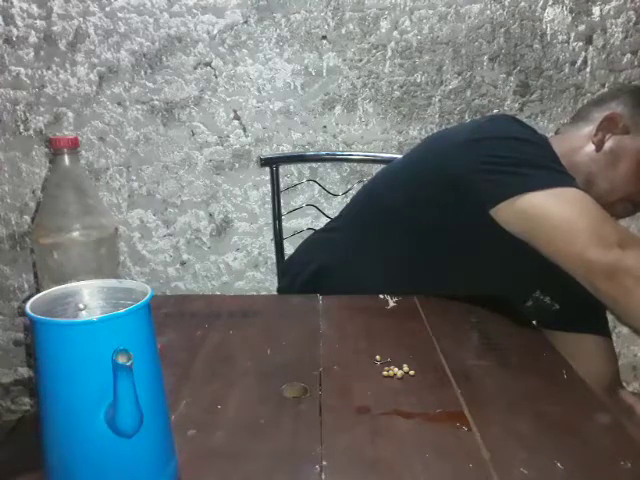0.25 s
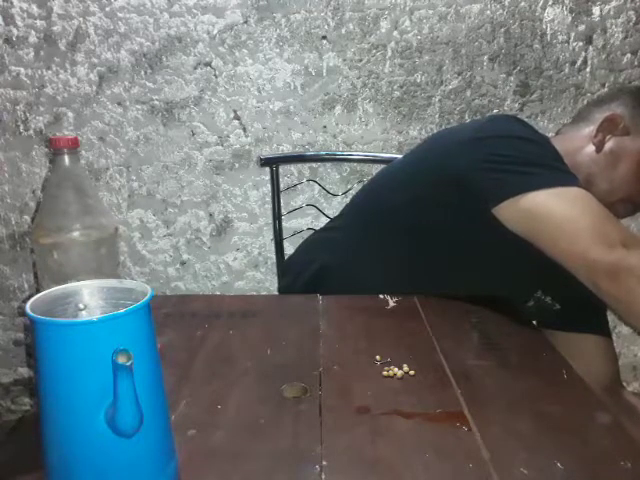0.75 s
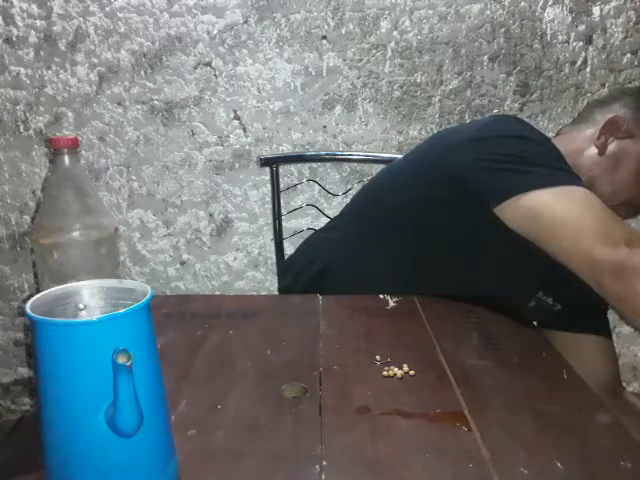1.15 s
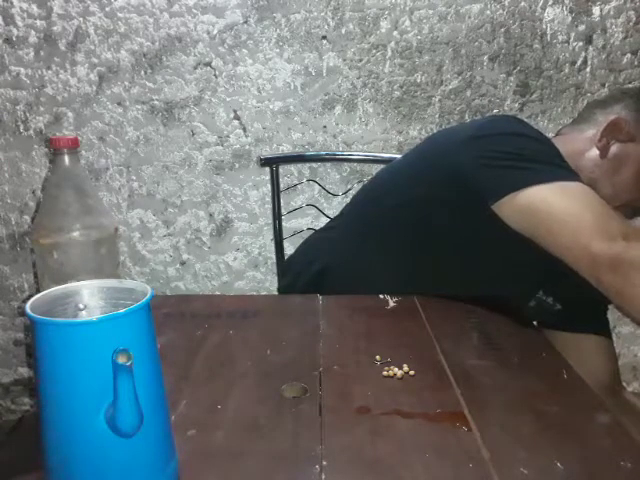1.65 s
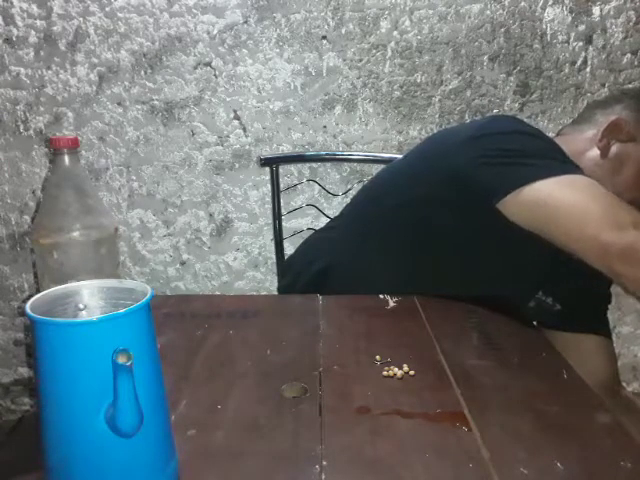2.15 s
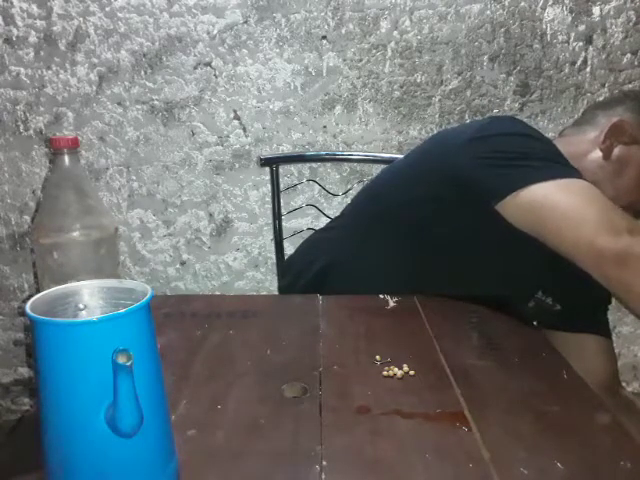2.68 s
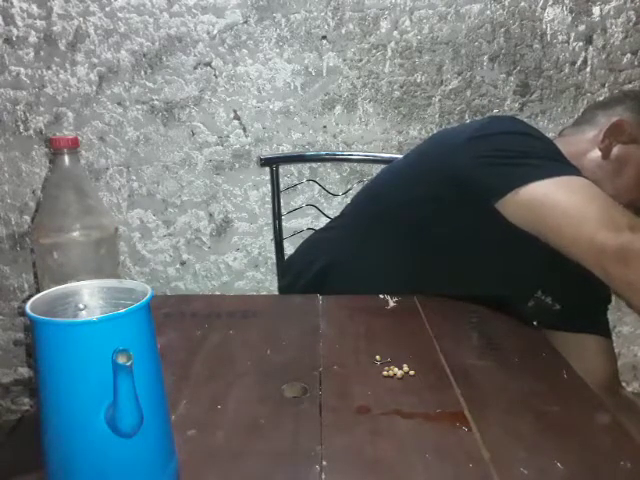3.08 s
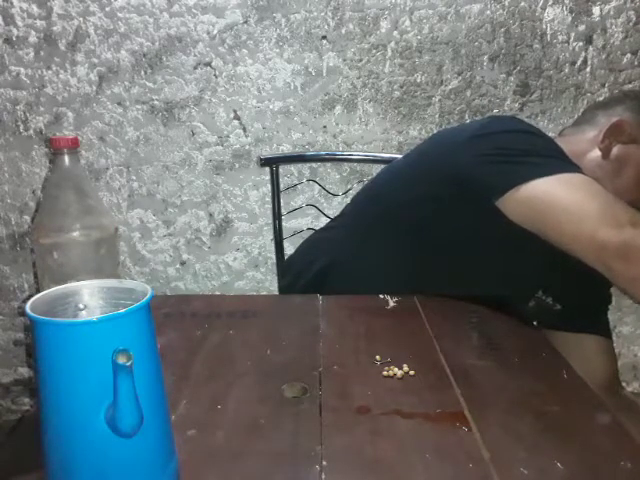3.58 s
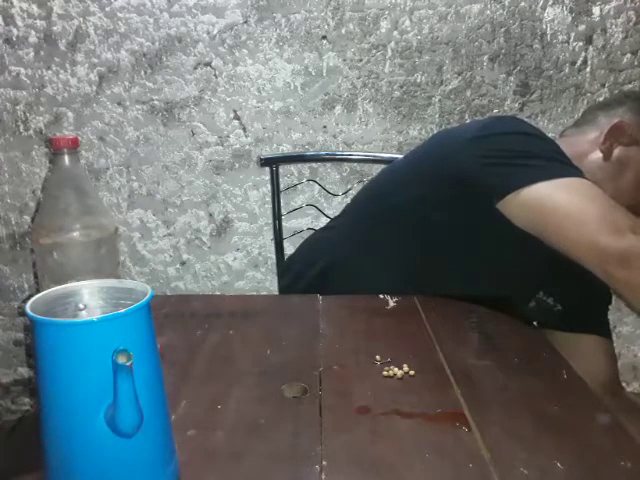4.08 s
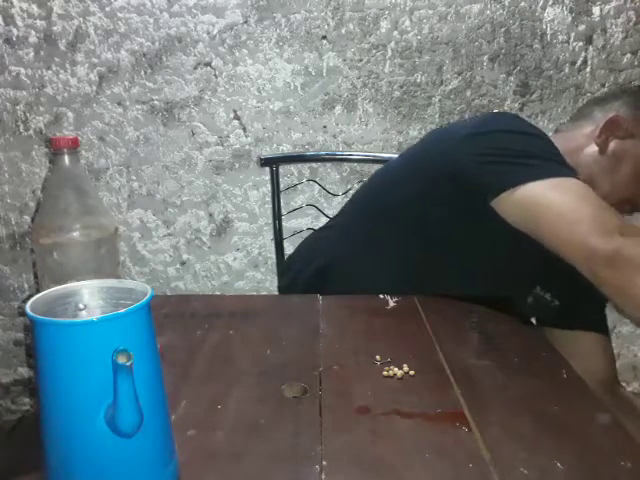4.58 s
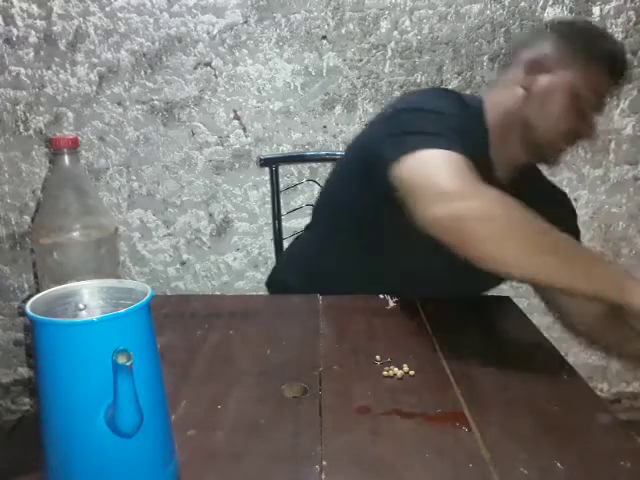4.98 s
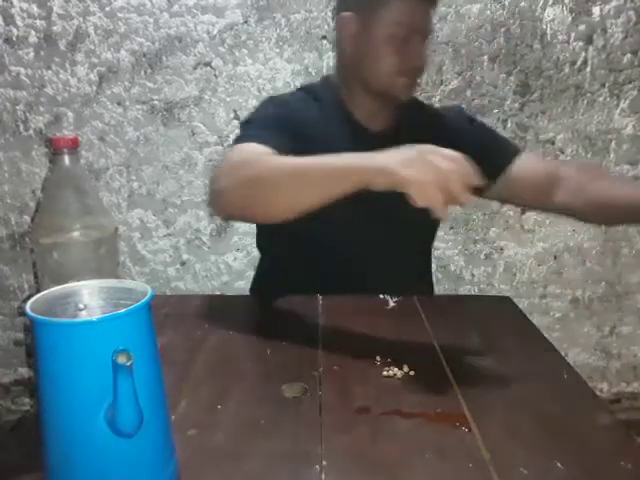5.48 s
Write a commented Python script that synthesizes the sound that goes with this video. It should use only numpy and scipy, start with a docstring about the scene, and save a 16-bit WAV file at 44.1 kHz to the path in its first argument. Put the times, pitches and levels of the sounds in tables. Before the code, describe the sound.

Indoors, close to the microphone, a flimsy bottle buckles under repeated squeezes. Each squeeze pushes out a faint breathy, spitting hiss; the plastic snaps in dry, irregular bursts with hollow low pops and small creasing ticks. Hard walls add a short bright ring. The strongest snaps come later, then the bottle moves away with a swelling scratchy rustle that stops abruptly, leaving low room tone.

```python
"""Over quiet room tone and a hollow rumble come faint cracks and a hiss: a hand squeezes a thin plastic bottle.
In a small hard-walled room it is squeezed and let go repeatedly; each squeeze drives out turbulent air and spray,
and a weak draught returns. The wall buckles in filtered noise bursts, with tiny ticking creases around them, and
its large panels pop as damped sines. At the end the bottle is moved away with a rustle of dense random slips."""
import sys
import numpy as np
from scipy import signal
from scipy.fft import rfft, irfft
from scipy.io import wavfile

SR = 44100
rng = np.random.default_rng(int(sys.argv[2]) if len(sys.argv) > 2 else 0)


def master_out(mix):
    """Clip the mix to full scale and print it as 16-bit PCM to the path in sys.argv[1]."""
    frames = np.transpose(np.atleast_2d(mix))
    ceiling = np.clip(frames, -1, 1)
    pcm = np.round(ceiling * 32767).astype(np.int16)
    wavfile.write(sys.argv[1], SR, pcm)


N = 253265
TIME = np.arange(N) / SR

# Spectrum of the cracking wall as heard, bright near 7.8 kHz with a dip at 9-10 kHz. Each row: frequency in Hz,
# relative level in dB per Hz.
WALL_COLOUR = [(70, -29), (160, -15), (500, -5.5), (850, -2.5), (1200, -4), (1700, 1), (3500, 3.5),
               (5500, 3), (7800, 7), (8400, 1), (9200, -10), (10200, -11.5), (11800, -8.5), (15500, -12)]
# Whole panels popping in or out. Each row: start in seconds, strength in dB before a common trim,
# pitch in Hz, 60 dB decay time in ms.
PANEL_POPS = [(.2907, -35.5, 624, 18), (0.532, -39.5, 603, 16), (.599, -30.5, 363, 9.7),
              (.618, -28, 470, 14), (0.7229, -36.5, 321, 9.2), (1.0487, -34.5, 473, 23),
              (1.2488, -34.5, 624, 22), (1.2897, -29.5, 404, 7.2), (1.2964, -27, 423, 14),
              (1.338, -22, 468, 7.8), (1.7489, -36, 517, 14), (1.8733, -36, 570, 11),
              (1.9613, -24, 380, 9.3), (2.0199, -26, 570, 10.4), (2.0959, -30.5, 418, 16),
              (2.241, -29.5, 406, 12), (3.002, -35, 348, 8.3), (3.0293, -28.5, 515, 8.3),
              (3.5926, -28, 444, 15), (3.6718, -27.5, 394, 12), (3.7075, -23, 420, 9),
              (3.8581, -23, 512, 6.8), (4.202, -24, 362, 9.9), (4.703, -32, 262, 12),
              (4.7279, -26.5, 475, 43), (4.8249, -33, 353, 10)]
# Squeezes of the hand. Each row: start in seconds, length in seconds, level of the air stream in dB
# before the gain of the jet.
HAND_SQUEEZES = [(.15, .295, -41.5), (.92, 0.23, -43), (1.606, 0.2, -41), (2.515, 0.24, -48),
                 (3.268, .17, -52), (3.938, 0.13, -52.5), (4.442, 0.13, -47.5)]
# strength of a typical buckle, from which knock and creasing are reckoned
TYPICAL_DB = -25
# the bottle is held until it starts to move away
MOVE_S = 5.09


def undb(db):
    """Logarithmic level: decibels become an amplitude gain."""
    return 10 ** (np.asarray(db) / 20)


def unit(x):
    """Energy normalisation: the squares sum to 1."""
    return x / np.sqrt(np.sum(x ** 2) + 1e-18)


def steady(x):
    """Power normalisation: the rms becomes 1."""
    return unit(x) * np.sqrt(len(x))


def strength(db):
    """Gain that gives a sound of energy 1 the energy of one millisecond at this level."""
    return undb(db) * np.sqrt(SR / 1000)


def spectrum(points, hz):
    """Interpolation of (Hz, value) points along a logarithmic frequency axis."""
    point_hz, value = np.transpose(points)
    return np.interp(np.log(hz + 1), np.log(point_hz), value)


def response(points, size=512):
    """Minimum phase: folding the cepstrum gives the causal impulse response of a (Hz, dB) colour."""
    log_gain = np.log(undb(spectrum(points, np.fft.rfftfreq(size, 1 / SR))))
    cepstrum = irfft(log_gain)
    cepstrum[1:size // 2] *= 2
    cepstrum[size // 2 + 1:] = 0
    return irfft(np.exp(rfft(cepstrum)))


def colour(x, points, size=512):
    """Linear filtering: convolution with an impulse response imposes the spectrum."""
    return signal.fftconvolve(x, response(points, size=size))[:len(x)]


def band(x, lo_hz, hi_hz, order=3):
    """Causal Butterworth band-pass, maximally flat between its edges."""
    edges_hz = [lo_hz, min(hi_hz, SR / 2 - 1)]
    return signal.sosfilt(signal.butter(order, edges_hz, "band", fs=SR, output="sos"), x)


def walk(rate):
    """Slow random modulation: straight lines join normal values drawn this many times a second."""
    knots = rng.standard_normal(1024)
    return np.interp(TIME * rate, np.arange(len(knots)), knots)


def add(track, s, sound):
    """Superposition: a sound is summed into a track at time s."""
    start = max(int(s * SR), 0)
    part = sound[:max(len(track) - start, 0)]
    track[start:start + len(part)] += part


def envelope(start_s, end_s, rise_s, fall_s):
    """Exponential build-up before the start, a gain of 1, and exponential decay after the end."""
    before, after = np.maximum(start_s - TIME, 0), np.maximum(TIME - end_s, 0)
    return np.exp(-before / rise_s - after / fall_s)


def grains(rate, spread_db):
    """Shot noise: sparse random ticks of very uneven size, rms 1; rate is in ticks per second."""
    chance, size, sign = rng.random(N), rng.exponential(size=N), rng.choice([-1, 1], N)
    return steady((chance < rate / SR) * sign * undb(spread_db * np.minimum(size, 3)))


def buckles():
    """Snap-through instability: all snaps of the wall, the distinct ones and the tick that starts each pop."""
    # Distinct buckles. Each row: start in seconds, strength of the crack in dB, pitch of the facet in Hz,
    # ring in ms, fizz in dB relative to the crack, share sent into the room in dB.
    distinct = [(.132, -53, 3500, 2, -16, 5), (.1428, -34, 3040, 1.5, -22, 3.5),
                (.2919, -24.5, 2290, 3, -6, -2), (.3118, -23.5, 5870, 0.47, -6.5, -3),
                (.4852, -39.5, 6500, 1.8, -7.5, 5.5), (.6186, -11, 7600, 0.41, -12, -11),
                (.6198, -13, 2100, 1.9, -13.5, 1), (.9069, -53.5, 2090, 2.3, -15, 0),
                (1.002, -35.5, 2070, 2, -18, -0.5), (1.0491, -22, 4850, 1.4, -13, -1),
                (1.0879, -25.5, 5100, 1.1, -12, -1.5), (1.2044, -46, 2100, 1.7, -11.5, 3),
                (1.2951, -31.5, 4400, 1.4, -26, 1), (1.3374, -13.5, 3080, 1.8, -27, -1),
                (1.5899, -38, 2250, 0.4, -30, 2), (1.6194, -38, 2090, 1.7, -16, 9.5),
                (1.7488, -31, 3550, 2.9, -16, 5.5), (1.8623, -36, 2180, 3.2, -10, 3),
                (2.0187, -19.5, 2160, 1.9, -13.5, -0.5), (2.2401, -14, 4370, 0.79, -16, 5.5),
                (2.242, -7.5, 5130, 2.1, -10.5, 2), (2.2545, -11, 4850, .4, -8, -1),
                (2.2683, -12.5, 6200, .3, -12.5, 3.5), (2.5033, -24, 7840, 2.5, -14, 6.5),
                (2.5722, -18.5, 5000, 1.7, -9.5, 1), (2.6183, -21.5, 8000, 0.39, 4, -7),
                (2.643, -29.5, 8200, 1.4, -6, 4), (2.6502, -21.5, 7100, 0.82, -4.5, 1.5),
                (2.6858, -31.5, 3950, 1.9, -5, 2.5), (2.8633, -33.5, 5400, .6, -17, -3),
                (2.9077, -31.5, 2500, 3.6, -28, 2), (2.92, -30.5, 2300, 4, -23, -16),
                (2.9248, -17.5, 3430, 2.4, -11.5, -0.5), (3.0278, -21.5, 5700, 0.56, -18.5, -5),
                (3.2569, -53, 2230, 1.8, -26, 3.5), (3.3062, -38, 3100, 1.5, -27.5, -5.5),
                (3.3735, -15.5, 4850, 1.1, -9.5, 1), (3.5175, -32, 4180, 0.78, -17.5, 2),
                (3.5812, -19.5, 2020, 1.7, -29, 1), (3.5913, -14.5, 2170, 0.9, -13.5, -2.5),
                (3.7071, -19, 6500, 1.3, -18.5, 3), (3.8574, -6, 4160, 3.2, -9.5, -3),
                (3.864, -11.5, 6200, 1, -13, 5), (4.155, -47, 7960, .5, 3.5, -1.5),
                (4.168, -16.5, 3930, 1.4, -13, -1.5), (4.2026, -13.5, 5250, 1.5, -17, -2),
                (4.2388, -12, 4500, 2.4, -15, 0.5), (4.2478, -8.5, 2060, 1.6, -17, -2),
                (4.4216, -18, 4700, 1.8, -11.5, -1.5), (4.4285, -27.5, 2050, 4.5, -22, 1.5),
                (4.5027, -12.5, 7100, 1.2, -7, -2.5), (4.6758, -25, 3780, 0.9, -20.5, -1.5),
                (4.7267, -25, 4570, 1.5, -19.5, -3), (4.8243, -6, 3970, 2.1, -13, 0),
                (5.1633, -40.5, 6000, .7, -22, -21)]
    # Faint crack with which every panel lets go. One row: the columns above without the start.
    panel_tick = (-40.5, 2501, 2.5, -17, 0)
    return list(distinct) + [(row[0], *panel_tick) for row in PANEL_POPS]


def snap(t, ring_ms, rise_s=0.00018, snap_s=0.00016, ring_share=0.35):
    """Impulsive excitation: a sharp kick, then a dense flurry of bending waves that dies in milliseconds."""
    fall_s = 2.16 * ring_ms / 1000
    decay = np.exp(-t / snap_s) + ring_share * np.exp(-t / fall_s)
    return rng.standard_normal(len(t)) * (1 - np.exp(-t / rise_s)) * decay


def knock(db, facet_hz, ring_ms):
    """Scaling law for the low knock, in dB re the crack: harder, higher or longer buckles knock less."""
    per_db, per_octave, per_ring_doubling = -0.383, -6, -0.5
    return (-9.5 + per_db * (db - TYPICAL_DB)
            + per_octave * np.log2(facet_hz / 4000)
            + per_ring_doubling * np.log2(ring_ms / 1.7))


def buckle(drive, facet_hz, knock_db, fizz_db, flank_db=-6, skirt_db=-10):
    """Resonant radiation: the thin wall answers with a crack at the facet's pitch, a knock below, fizz above."""
    wall = colour(drive, WALL_COLOUR)
    peak_hz = facet_hz * np.array([1 / 2.5, 1 / 1.35, 1, 1.35, 2.5])
    facet = colour(wall, np.transpose([peak_hz, [skirt_db, flank_db, 0, flank_db, skirt_db]]))
    spectra, freqs = rfft([wall, facet, wall]), np.fft.rfftfreq(len(drive), 1 / SR)
    # soft crossovers at 2100 and 9400 Hz share the spectrum among the three
    above_knock = 1 / (1 + (2100 / (freqs + 1)) ** 6)
    above_crack = 1 / (1 + (9400 / (freqs + 1)) ** 24)
    low, crack, fizz = irfft(spectra * [1 - above_knock, above_knock - above_crack, above_crack])
    return unit(crack) + undb(knock_db) * unit(low) + undb(fizz_db) * unit(fizz)


def cracks(lead_s=.001, size=2048, count=3):
    """Directional radiation: every buckle as heard directly, and as it leaves in one of a few directions."""
    direct, outward = np.zeros(N), np.zeros((count, N))
    lead = int(lead_s * SR)
    t = np.maximum(TIME[:size] - lead / SR, 0)
    click = (np.arange(size) == lead) * 1.
    for k, (s, db, facet_hz, ring_ms, fizz_db, room_db) in enumerate(buckles()):
        start_s = s - lead / SR
        knock_db = knock(db, facet_hz, ring_ms)
        heard = buckle(snap(t, ring_ms), facet_hz, knock_db, fizz_db)
        add(direct, start_s, strength(db) * heard)
        # summed over all directions the peaks and dips of the wall's ringing even out
        sent = buckle(click, facet_hz, knock_db, fizz_db)
        add(outward[k % count], start_s, strength(db) * undb(room_db) * sent)
    return direct, outward


def thump(t, hz, t60_ms, body_db=-6, overtone=2.1, overtone_db=-4.0, overtone_t60=0.0091, detune=0.044,
          push_s=0.00091):
    """Modal decay: a panel swings a few times and sets off the hollow modes, which every new dent retunes."""
    # Hollow modes of the bottle. Each row: frequency in Hz, relative level in dB, 60 dB decay time in seconds.
    hollow_modes = [(141, -4, 0.16), (282.6, -0.5, 0.024), (579, 4.5, 0.042), (855, -1.5, 0.014)]
    push = 1 - np.exp(-t / push_s)
    swing = np.sin(2 * np.pi * hz * t) * undb(-60 * t / (t60_ms / 1000))
    # its next bending shape is higher and dies fast
    flex = np.sin(2 * np.pi * hz * overtone * t) * undb(overtone_db - 60 * t / overtone_t60)
    mode_hz, db, mode_t60 = np.transpose(hollow_modes)[:, :, None]
    shift, turn = rng.standard_normal((2, len(hollow_modes), 1))
    tones = np.sin(2 * np.pi * (mode_hz * (1 + detune * shift) * t + turn))
    modes = (undb(db - 60 * t / mode_t60) * tones).sum(axis=0)
    sound = unit((swing + flex) * push) + undb(body_db) * unit(modes * push)
    # the pops carry almost no deep bass
    return unit(band(sound, 130, 1600, order=4))


def thumps(trim_db=-0.5, size=4096, count=3):
    """Directional radiation of the large panels: dull pops, each facing one of a few directions."""
    out = np.zeros((count, N))
    for k, (s, db, hz, t60_ms) in enumerate(PANEL_POPS):
        add(out[k % count], s, strength(db + trim_db) * thump(TIME[:size], hz, t60_ms))
    return out


def stream(arch_drop_db=24.5, arch_power=3.58, refill_db=-23, refill_s=0.055):
    """Pressure-driven flow: a flat-topped arch for each squeeze, then a weak draught back in."""
    out = np.zeros(N)
    for s, length_s, db in HAND_SQUEEZES:
        # 0 in the middle of the squeeze, 1 at both ends, where the arch is down by its full drop
        from_middle = np.minimum(np.abs(2 * (TIME - s) / length_s - 1), 2)
        out += undb(db - arch_drop_db * from_middle ** arch_power)
        # the draught peaks refill_s after the squeeze ends
        since = np.maximum(TIME - s - length_s, 0) / refill_s
        out += undb(db + refill_db) * since * np.exp(1 - since)
    return out


def jet(gain_db=4.0, flutter_db=2.1, spray_db=-4):
    """Turbulent jet noise: air with fine spitting droplets leaves the neck; the flow flutters."""
    # Spectrum of the jet. Each row: frequency in Hz, relative level in dB per Hz.
    jet_spectrum = [(120, -32.5), (250, -24.5), (700, -14), (1200, -10.5), (2600, -9), (4000, -5.5),
                    (4800, -9), (7200, 1.5), (8200, 1), (9200, -13), (10200, -9), (11800, -4), (15500, -7)]
    flow = rng.standard_normal(N) + undb(spray_db) * grains(1200, 6.4)
    return steady(colour(flow, jet_spectrum)) * stream() * undb(gain_db + flutter_db * walk(70))


def strain(growth_per_db=0.1064, rise_s=0.016, fall_s=0.14, rest_before_s=0.077, rest_s=0.045, rest_db=-23.5):
    """Stress relaxation: creasing builds up to each buckle, dies away after it and drops while the hand rests."""
    out = np.zeros(N)
    for s, db, *_ in buckles():
        size = undb(growth_per_db * (db - TYPICAL_DB))
        out = np.maximum(out, size * envelope(s, s, rise_s, fall_s))
    # each rest is a bell-shaped dip centred just before a squeeze
    resting = sum(np.exp(-((TIME - s + rest_before_s) / rest_s) ** 2) for s, _, _ in HAND_SQUEEZES)
    return out * undb(rest_db * resting)


def crinkle(rate=260, spread_db=5, ring_s=0.00059, treble_hz=6500, size=512, buckle_db=-59, squeeze_db=-10):
    """Crackling noise: tiny creases tick and ring briefly around the buckles and under each squeeze."""
    energy = signal.lfilter(np.exp(-2 * TIME[:size] / ring_s), 1, grains(rate, spread_db) ** 2)
    ticks = np.sqrt(energy) * rng.standard_normal(N)
    sound = steady(band(colour(ticks, WALL_COLOUR), 300, treble_hz, order=1))
    # squeeze_db is relative to the air stream
    return sound * (undb(buckle_db) * strain() + undb(squeeze_db) * stream())


def rustle(start_db=-52.5, swell_db_per_s=9.5, uneven_db=1.5, spread_db=4.0):
    """Stick-slip friction: plastic slides in dense, uneven little slips, swells, then stops short."""
    # Spectrum of the rustle. Each row: frequency in Hz, relative level in dB per Hz.
    rustle_spectrum = [(200, -24), (480, -14), (680, 4), (1400, 4.5), (4000, 3.5), (5000, 2), (7800, 4),
                       (9200, -13.5), (12500, -12), (15500, -16)]
    db = start_db + swell_db_per_s * (TIME - MOVE_S) + uneven_db * walk(50)
    moving = envelope(MOVE_S, 5.443, rise_s=.04, fall_s=0.005)
    return steady(colour(grains(1700, spread_db), rustle_spectrum)) * undb(db) * moving


def handling(start_db=-70, easing_db_per_s=-2.5, fall_s=0.089, uneven_db=3):
    """Contact noise: fingers shifting on the bottle raise a faint, uneven hollow rumble as the grip eases."""
    held = np.exp(-np.maximum(TIME - MOVE_S, 0) / fall_s)
    db = start_db + easing_db_per_s * TIME + uneven_db * walk(51)
    return steady(band(rng.standard_normal(N), 130, 500, order=2)) * held * undb(db)


def echoes(x):
    """Specular reflection: the sound with its first delayed copies from floor and wall."""
    # First reflections. Each row: delay in seconds, level in dB relative to the direct sound.
    reflections = [(.0043, -31.5), (0.0138, -17.5)]
    out = x.copy()
    for delay_s, db in reflections:
        add(out, delay_s, undb(db) * x)
    return out


def room(x, build_s=0.00082, gap_s=0.0034, patchy_db=4, blend_s=.12, count=14):
    """Reverberation: uneven clumps of reflections blend into a diffuse tail, each band with its own decay."""
    # Room tail. Each row: frequency in Hz, 60 dB decay time in seconds, energy in dB relative to the direct sound.
    tail_bands = [(150, 0.37, -1), (404, 0.32, -3.5), (963, 0.39, -8.5), (2860, 0.37, -6.5),
                  (6830, 0.31, -11.5), (12900, .25, -11)]
    t = TIME[:32768]
    hz, t60, db = np.transpose(tail_bands)
    clumps = undb(patchy_db * walk(700)[:len(t)] * np.exp(-t / blend_s))
    noise, freqs = rfft(rng.standard_normal(len(t)) * clumps), np.fft.rfftfreq(len(t), 1 / SR)
    edges = np.geomspace(80, 18000, count + 1)
    onset = 1 - np.exp(-np.maximum(t - gap_s, 0) / build_s)
    tail = np.zeros(len(t))
    for lo, hi in zip(edges, edges[1:]):
        centre = np.log(lo * hi) / 2  # on a log-frequency axis
        part = irfft(noise * (freqs >= lo) * (freqs < hi), len(t)) * onset
        part *= np.exp(-np.log(1000) * t / np.interp(centre, np.log(hz), t60))
        # wider bands carry more of the energy of a flat spectrum
        share = np.sqrt(2 * (hi - lo) / SR)
        tail += unit(part) * share * undb(np.interp(centre, np.log(hz), db))
    return signal.fftconvolve(x, tail)[:N]


def ambience(level_db=-72, wander_db=0.51):
    """Stationary background noise: quiet room tone with a low drone, wandering slightly in level."""
    # Spectrum of the room tone. Each row: frequency in Hz, relative level in dB per Hz.
    tone_spectrum = [(18, -40.5), (30, -19.5), (75, -14.5), (88, -10), (114, -0.5), (152, -8), (219, -12),
                     (277, -18.5), (350, -16), (3150, -30.5), (7460, -22), (9190, -35.5), (15500, -26.5)]
    tone = steady(colour(rng.standard_normal(N), tone_spectrum, size=4096))
    return tone * undb(level_db + wander_db * walk(1.3))


def scene():
    """Superposition of direct sound, first reflections, the room's answer along each direction and room tone."""
    snaps, outward = cracks()
    pops = thumps()
    soft = jet() + crinkle() + handling() + rustle()
    tail = room(soft) + sum(room(path) for path in outward + pops)
    direct = snaps + pops.sum(axis=0) + soft
    return (echoes(direct) + tail + ambience())[None]


def record(dry, top_hz=15900):
    """Saturation and band-limiting: peaks clip at full scale, then a steep low-pass cuts the top."""
    low_pass = signal.ellip(8, .2, 70, top_hz, fs=SR, output="sos")
    return signal.sosfilt(low_pass, np.clip(dry, -1, 1))


dry = scene()
out = record(dry)
master_out(out)
```